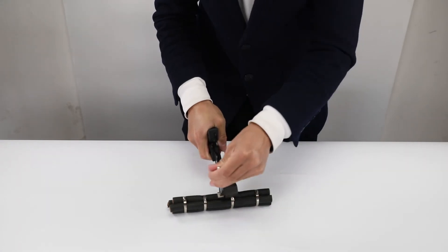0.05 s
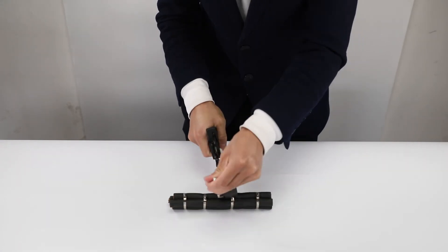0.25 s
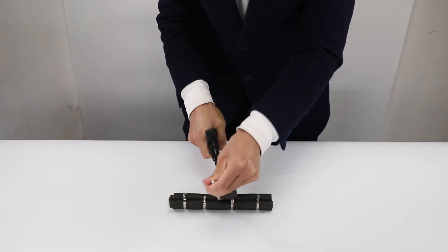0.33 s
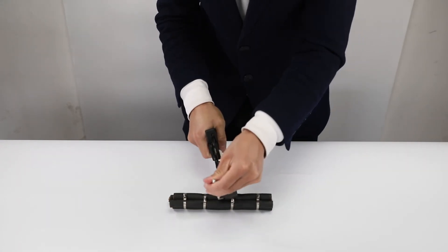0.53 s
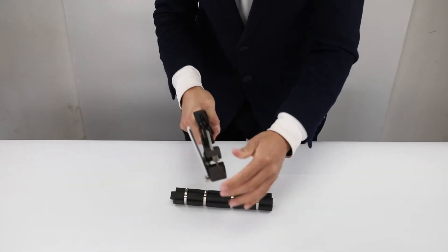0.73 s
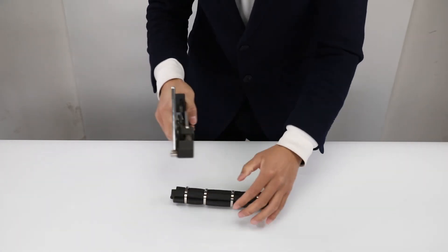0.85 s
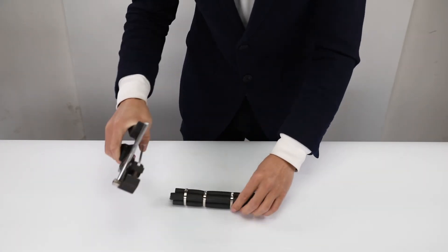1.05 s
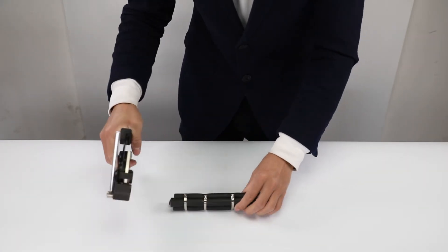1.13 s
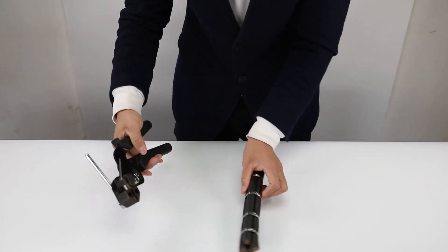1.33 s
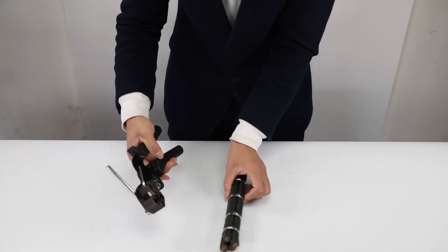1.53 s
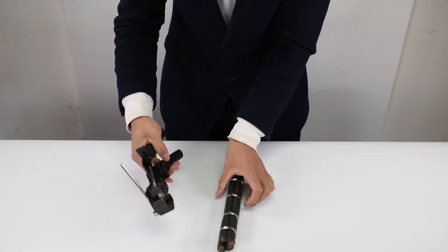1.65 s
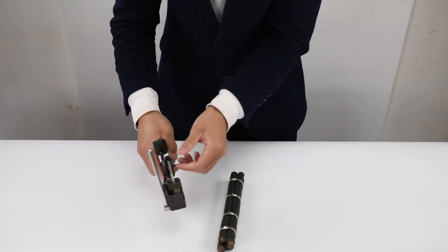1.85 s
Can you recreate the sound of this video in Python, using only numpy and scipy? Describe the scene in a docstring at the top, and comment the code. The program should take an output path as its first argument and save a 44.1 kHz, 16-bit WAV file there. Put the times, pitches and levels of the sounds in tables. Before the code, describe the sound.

A steel strap snaps sharply under a hand cutter, thudding into the tabletop. Then come a metallic clack, small clicks, soft bumps and a brief scrape of a cable bundle, echoing in a bare room with faint ventilation.

```python
"""Cutting a steel strap

A hand tool shears a steel strap on a cable bundle: a hard snap that thumps the table beneath.
The handle springs open with a clack, loose steel parts tick, and the bundle is bumped and slid
across the table. Hits are bursts of noise and fading tones; rubbing is noise that swells and fades.
A bare, softly humming room echoes the hits and scrapes."""
import sys
import numpy as np
from scipy import signal
from scipy.fft import rfft, irfft, next_fast_len
from scipy.io import wavfile
from scipy.ndimage import uniform_filter1d

SR = 44100
rng = np.random.default_rng(int(sys.argv[2]) if len(sys.argv) > 2 else 0)


def int16_out(signal):
    """Quantize to a 16-bit WAV file."""
    q = np.round(np.clip(np.atleast_2d(signal).T, -1, 1) * 32767)
    wavfile.write(sys.argv[1], SR, q.astype(np.int16))


N = 83790

# A "colour" says how strong each frequency is. A "fade" is the time taken to drop by 60 dB.
# how long the room rings (frequency [Hz], fade [s])
ROOM_FADES = [(100, 0.55), (400, 1), (900, 1), (1500, 1), (4000, 1), (7000, 0.74), (10000, 0.5),
              (12500, 0.43), (15000, 0.19)]
# separate wall echoes of the table's sounds (delay [s], level [dB])
TABLE_ECHOES = [(0.048, -17), (0.0897, -13.5)]
# ventilation noise (frequency [Hz], level [dB])
AIR_COLOUR = [(15, -56), (25, -70), (64, -0.5), (92, -16), (123, 1.5), (190, -9.5), (394, -6), (516, -13),
              (575, -5), (695, -7), (936, -8.5), (1230, -11), (2160, -16), (4370, -27.5), (16000, -44.5)]
# low rumble at the start (frequency [Hz], level [dB])
RUMBLE_COLOUR = [(50, -10), (90, 2), (160, -7), (280, 2.5), (450, -1.5), (750, -18), (1300, -7.5),
                 (2000, -26), (8000, -38)]

# steel bands gliding on the table (peak time [s], level [dB], rise [s], fall [s], pitch [Hz])
BAND_GLIDES = [(1.65, -62, 0.11, 0.098, 4520), (1.87, -62, 0.099, 0.03494, 6460)]
# sleeves and hands rustling (peak time [s], level [dB], rise [s], fall [s])
RUSTLE_STROKES = [(.045, -45.5, 0.084, 0.083), (1.1, -51.5, 0.042, 0.049), (1.56, -56.5, 0.072, 0.098),
                  (1.72, -63, 0.014, 0.01674)]
# their hiss (frequency [Hz], level [dB])
RUSTLE_COLOUR = [(300, -77), (1300, 8), (3000, 6), (5300, -5), (6500, 7), (8400, 0), (10000, 2.5),
                 (15000, -21)]
# the bundle scraping (peak time [s], level [dB], rise [s], fall [s])
SCRAPE_STROKES = [(1.075, -34.5, 0.007, 0.033)]
# its rasp (frequency [Hz], level [dB])
SCRAPE_COLOUR = [(100, -27), (270, 17), (600, 4), (1300, 2.5), (1900, 0.5), (2200, 1), (3400, -1),
                 (6000, -22), (15000, -26)]
# the bundle dragging (peak time [s], level [dB], rise [s], fall [s])
DRAG_STROKES = [(1.13, -37.5, 0.0093, 0.022), (1.2, -34, 0.024, 0.026)]
# its low rub (frequency [Hz], level [dB])
DRAG_COLOUR = [(50, -67), (125, 13), (180, -4), (300, -24), (500, -4.5), (1100, -12), (3000, -45),
               (10000, -48)]

# soft low thuds: bumps on the table and their wall echoes (time [s], level [dB], pitch [Hz])
SOFT_THUDS = [(0.711, -18, 194), (0.799, -24, 221), (0.828, -25, 206), (0.995, -20, 203),
              (1.0193, -17.5, 228), (1.534, -30, 193), (1.608, -15.5, 221), (1.761, -44, 237)]
# faint tap on each thud (frequency [Hz], level [dB])
TAP_COLOUR = [(200, -6), (500, 4), (1200, 10), (3500, -2), (8000, -20), (15000, -33)]
# the bundle knocking on the table (time [s], level [dB], fade [s])
KNOCK_HITS = [(.7125, -38.5, 0.026), (.998, -33, 0.016), (1.6088, -30.5, 0.029)]
# its hollow sound (frequency [Hz], level [dB])
KNOCK_COLOUR = [(100, -16), (200, 5), (350, -11), (490, 13), (680, -2), (1200, -2.5), (3800, -11),
                (6000, -22.5), (15000, -32.5)]

# a loose piece of steel touching twice (time [s], level [dB])
CLINK_HITS = [(.9805, -27), (.9849, -30)]
# its ringing tones (pitch [Hz], level [dB], fade [s])
CLINK_TONES = [(4549, 0, .022), (10120, -14, .04), (11060, -15, .06), (15350, -12, .025)]
# loose steel parts (time [s], level [dB], pitch [Hz], ring above the click [dB], fade [s])
TICK_HITS = [(0.897, -30.5, 6970, 2, 0.016), (0.901, -30, 7750, -6, 0.03),
             (0.9714, -37.5, 7160, 8.5, 0.012), (0.98, -36.5, 6500, 1, 0.034),
             (1.2404, -43, 9726, -1, 0.077)]
# their bright click (frequency [Hz], level [dB])
TICK_COLOUR = [(2000, -49.5), (5500, -9.5), (7500, -4), (11000, 0.5), (15500, -15)]

# the handle springing open (time [s], level [dB], fade [s])
CLACK_HITS = [(.7224, -31, 0.0228), (.7237, -9.5, 0.0062), (.7258, -23, 0.082)]
# its burst of noise (frequency [Hz], level [dB])
CLACK_COLOUR = [(500, -10), (1500, -7), (2800, -4), (4200, -2), (5100, -12.5), (5900, 2), (6800, 4),
                (8400, -0.5), (9500, 1.5), (11000, -5), (12500, -8), (15500, -26)]
# ringing handle and spring (pitch [Hz], level [dB], fade [s])
HANDLE_TONES = [(2666, -40, 0.18), (6760, -34.5, 0.2), (7450, -16, 0.014)]

# the blade breaking through, then the tool kicking back (time [s], level [dB], fade [s])
SNAP_HITS = [(.2406, -6, 0.01), (.2418, -13.5, 0.03), (.2450, -14, 0.028)]
# its burst of noise (frequency [Hz], level [dB])
SNAP_COLOUR = [(60, -18), (200, 12), (550, 3.5), (950, -0.5), (1300, -2.5), (1900, -2.5), (2700, -5),
               (4000, -3.5), (5000, -7.5), (6200, -6.5), (7300, 1.5), (8500, -7), (10200, -0.5),
               (11900, -8), (15500, -22)]
# ringing cutting head (pitch [Hz], level [dB], fade [s])
HEAD_TONES = [(1590, -25, 0.022), (1830, -23, 0.014), (3950, -20, 0.029), (7250, -17.5, 0.04),
              (10110, -8.5, 0.0058), (10900, -19, 0.01)]
# the table ringing under the snap (pitch [Hz], level [dB], fade [s])
TABLE_TONES = [(110, -20.5, 0.17), (238, -9.5, 0.12), (400, -19, 0.034), (446.7, -14, 0.099)]
# the whole table top booming into the room (frequency [Hz], level [dB])
BOOM_COLOUR = [(50, -32), (120, 1.5), (160, -8.5), (220, 3.5), (290, -2), (460, -1), (580, -9),
               (800, -20.5), (2000, -51.5)]


def amp(db):
    """Turn decibels into a number to multiply by."""
    return 10 ** (np.asarray(db) / 20)


def unit(x):
    """Scale a sound to an average strength (rms) of 1."""
    return x / np.sqrt(np.mean(x ** 2) + 1e-20)


def along(points, hz):
    """Read between the rows of a frequency table, on a log scale."""
    freqs, values = np.transpose(points)
    return np.interp(np.log(hz + 1), np.log(freqs + 1), values)


def since(start):
    """Seconds since the start time, zero before it."""
    return np.maximum(np.arange(N) / SR - start, 0)


def filtered(x, response):
    """Turn each frequency up or down by response(hz)."""
    size = next_fast_len(N + 8192)
    return irfft(rfft(x, size) * response(np.fft.rfftfreq(size, 1 / SR)), size)[:N]


def noise(colour):
    """Steady noise of the given colour, at strength 1."""
    return unit(filtered(rng.standard_normal(N), lambda hz: amp(along(colour, hz))))


def click(colour, size=2048):
    """One click of the given colour, with a total energy of 1."""
    gains = amp(along(colour, np.fft.rfftfreq(size, 1 / SR)))
    cepstrum = irfft(np.log(gains))
    # folding onto the first half packs the energy at the start of the click
    cepstrum[1:size // 2] *= 2
    cepstrum[size // 2 + 1:] = 0
    pulse = irfft(np.exp(rfft(cepstrum)))
    return pulse / np.linalg.norm(pulse)


def strike(start, fade, rise=0.0001):
    """The loudness of a hit: it rises quickly, then dies away."""
    t = since(start)
    return (1 - np.exp(-t / rise)) * np.exp(-np.log(1000) * t / fade)


def swell(peak, db, rise, fall):
    """The loudness of one stroke: it grows until the peak time, then falls."""
    t = since(0)
    width = np.where(t < peak, rise, fall)
    return amp(db) * np.exp(-0.5 * ((t - peak) / width) ** 2)


def ring(start, tones, rise=0.000067):
    """A struck object rings with a few fading tones."""
    t = since(start)
    return sum(amp(db) * strike(start, fade, rise) * np.sin(2 * np.pi * hz * t)
               for hz, db, fade in tones)


def push(start, db, hz, rise):
    """A short vibration that swells and dies away."""
    t = since(start)
    shape = (t / rise * np.exp(1 - t / rise)) ** 2
    return amp(db) * shape * np.sin(2 * np.pi * hz * t)


def impacts(hits, colour, spike_gain=2.9):
    """Hard contacts: each is a sharp spike, then a quickly dying burst of noise."""
    force = sum(amp(db) * strike(start, fade) * rng.standard_normal(N) for start, db, fade in hits)
    for start, db, _ in hits:
        force[int(start * SR)] += spike_gain * amp(db)
    return signal.fftconvolve(force, click(colour))[:N]


def rub(strokes, colour, grain_db):
    """Rubbing: noise with a flickering level swells and fades with each stroke."""
    grain = unit(uniform_filter1d(rng.standard_normal(N), size=128))
    friction = unit(noise(colour) * amp(grain_db * grain))
    return sum(swell(*stroke) for stroke in strokes) * friction


def walls(x):
    """The room's answer: weak near echoes, a cluster from the far wall, then a smooth tail."""
    hz, t, spectrum = signal.stft(rng.standard_normal(SR), SR, nperseg=256)
    decay = np.exp(-np.log(1000) * t / along(ROOM_FADES, hz)[:, None])
    tail = signal.istft(spectrum * decay, SR, nperseg=256)[1]
    t = np.arange(len(tail)) / SR
    early = 0.56 * np.clip(t / 0.0073, 0, 1)
    late = np.clip((t - 0.022) / 0.02, 0, 1)  # starts after 22 ms, builds for 20 ms
    far_wall_db = 5 * np.exp(-((t - 0.0392) / 0.0014) ** 2)
    tail = tail * np.maximum(early, late) * amp(far_wall_db)
    return signal.fftconvolve(x, tail / np.linalg.norm(tail))[:N]


def in_room(x, room_db):
    """The direct sound plus the answer of the walls."""
    return x + amp(room_db) * walls(x)


def table_echo(x):
    """The room's answer to the table, with two separate wall echoes added."""
    echoes = sum(amp(db) * np.pad(x, (round(delay * SR), 0))[:N] for delay, db in TABLE_ECHOES)
    return walls(x) + echoes


def room_tone(air_db=-41.5, rumble_db=-34.5):
    """Steady ventilation noise, and a low rumble that dies away at the start."""
    air = amp(air_db) * noise(AIR_COLOUR)
    rumble = amp(rumble_db) * strike(0, fade=1) * noise(RUMBLE_COLOUR)
    return air + rumble


def glides(width=0.023):
    """Light rubbing makes the steel bands sing: noise in a narrow range around one pitch."""
    sound = np.zeros(N)
    for peak, db, rise, fall, pitch in BAND_GLIDES:
        singing = filtered(rng.standard_normal(N), lambda hz: 1 / (1 + ((hz / pitch - 1) / width) ** 2))
        sound += swell(peak, db, rise, fall) * unit(singing)
    return sound


def handling():
    """The bundle squeaks, scrapes and drags over the table; sleeves and hands rustle."""
    squeak = push(start=1.064, db=-39, hz=1910, rise=0.013)
    scrape = rub(SCRAPE_STROKES, SCRAPE_COLOUR, grain_db=-0.5)
    drag = rub(DRAG_STROKES, DRAG_COLOUR, grain_db=0)
    slide = in_room(squeak + scrape + drag, room_db=-9.5)
    return slide + rub(RUSTLE_STROKES, RUSTLE_COLOUR, grain_db=2)


def thuds(tap_db=-19.5, room_db=-4):
    """Table bumps and their wall echoes: low thuds with a faint tap, some with a hollow knock."""
    sound = impacts(KNOCK_HITS, KNOCK_COLOUR)
    for start, db, hz in SOFT_THUDS:
        tap = amp(db + tap_db) * strike(start, fade=0.014, rise=0.002762) * noise(TAP_COLOUR)
        sound += push(start, db, hz, rise=0.0029) + tap
    return sound + amp(room_db) * table_echo(sound)


def clink():
    """A small piece of steel touches twice, and its ring dies at once."""
    touches = sum(amp(db) * ring(start, CLINK_TONES, rise=0.00067) for start, db in CLINK_HITS)
    return in_room(touches, room_db=-12)


def ticks():
    """Loose steel parts touch, each with a click and one short ring."""
    sound = np.zeros(N)
    for start, db, hz, ring_db, fade in TICK_HITS:
        sound += impacts([(start, db, fade)], TICK_COLOUR)
        sound += ring(start, [(hz, db + ring_db, fade)])
    return in_room(sound, room_db=-8)


def steel_hit(hits, colour, tones, room_db, directions=6):
    """The tool rings and sends a different burst in each direction; the walls blend them."""
    ringing = ring(hits[0][0], tones)
    blend = sum(walls(impacts(hits, colour) + ringing) for _ in range(directions)) / np.sqrt(directions)
    direct = impacts(hits, colour) + ringing
    return direct + amp(room_db) * blend


def clack():
    """The handle hits its stop and its spring rings."""
    return steel_hit(CLACK_HITS, CLACK_COLOUR, HANDLE_TONES, room_db=-6.5)


def snap(boom_db=15):
    """The strap breaks with a crack; the kick thumps the table, which booms into the room."""
    start = SNAP_HITS[0][0]
    crack = steel_hit(SNAP_HITS, SNAP_COLOUR, HEAD_TONES, room_db=-6)
    thump = ring(start, TABLE_TONES, rise=0.001)
    knock = push(start=0.2493, db=-11, hz=470, rise=0.0048)  # the kick drives the bundle into the table
    boom = amp(boom_db) * np.pad(click(BOOM_COLOUR), (round(start * SR), N))[:N]
    return crack + thump + knock + table_echo(boom)


def scene():
    """Add all the sounds together in one channel."""
    return (snap() + clack() + ticks() + clink() + thuds() + handling() + glides() + room_tone())[None]


def record(dry):
    """Thin out the deepest bass, clip at full scale and remove the highest treble."""
    low_cut_hz, top_hz = 48, 16000
    bass_cut = signal.butter(2, low_cut_hz, "highpass", fs=SR, output="sos")
    clipped = np.clip(signal.sosfilt(bass_cut, dry[0]), -1, 1)
    return filtered(clipped, lambda hz: hz < top_hz)[None]


dry = scene()
out = record(dry)
int16_out(out)
```